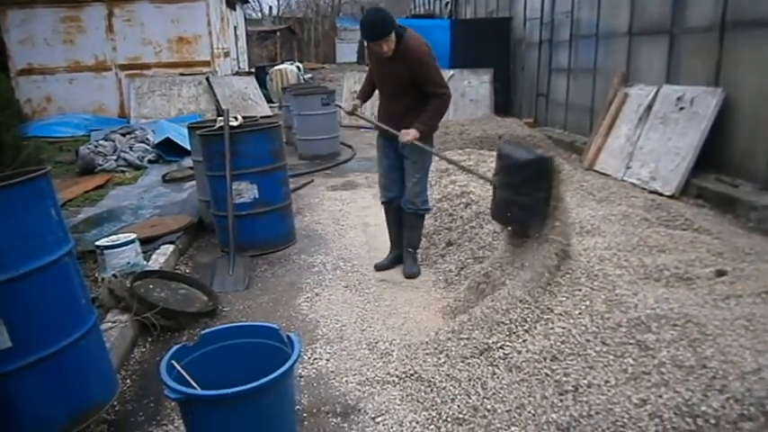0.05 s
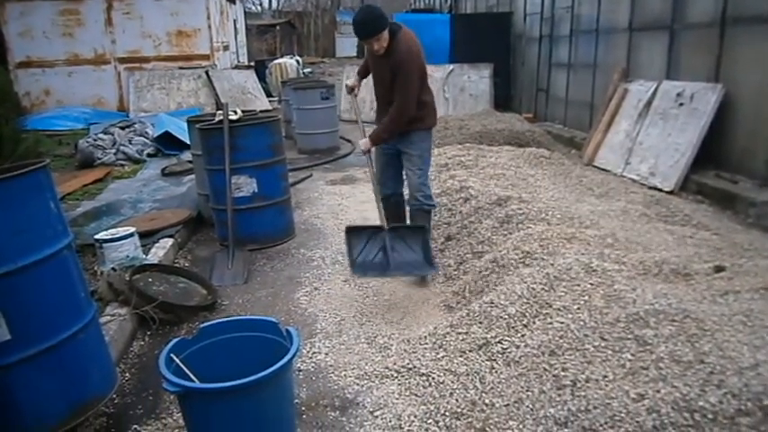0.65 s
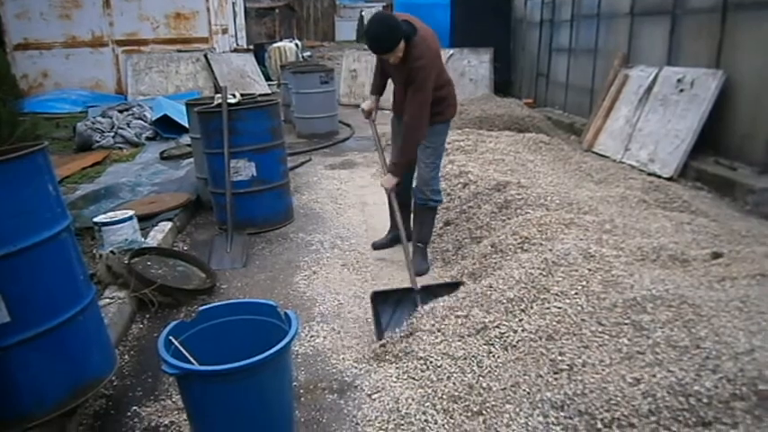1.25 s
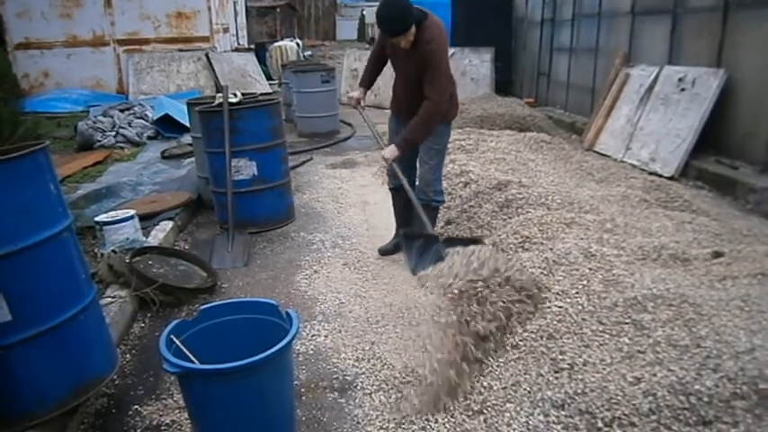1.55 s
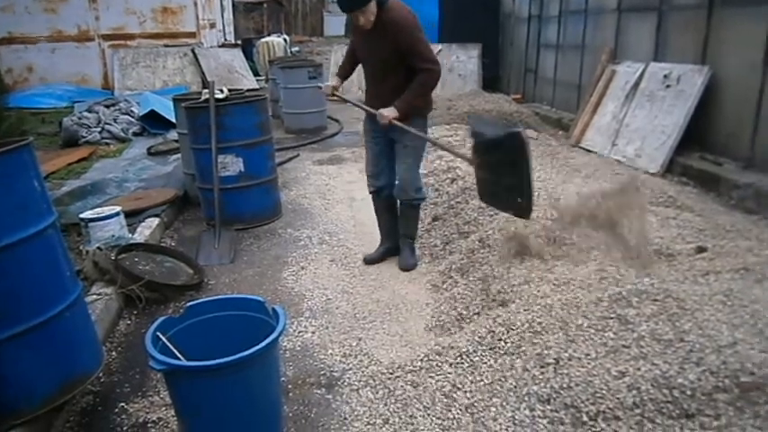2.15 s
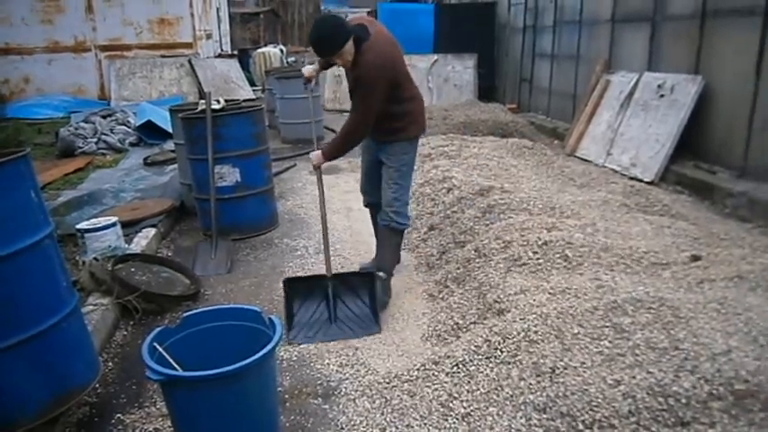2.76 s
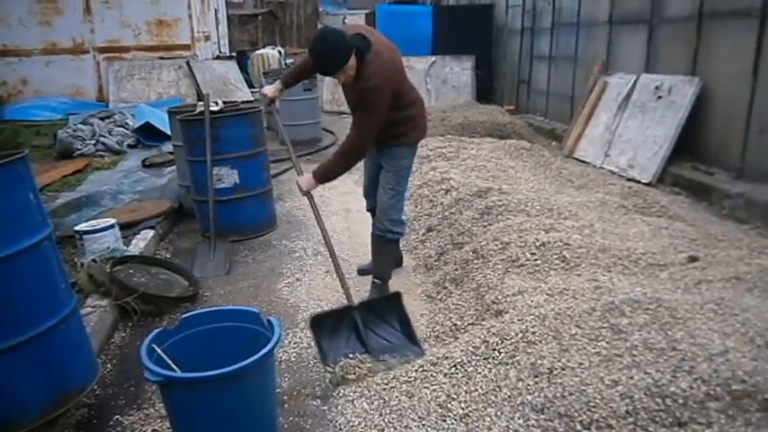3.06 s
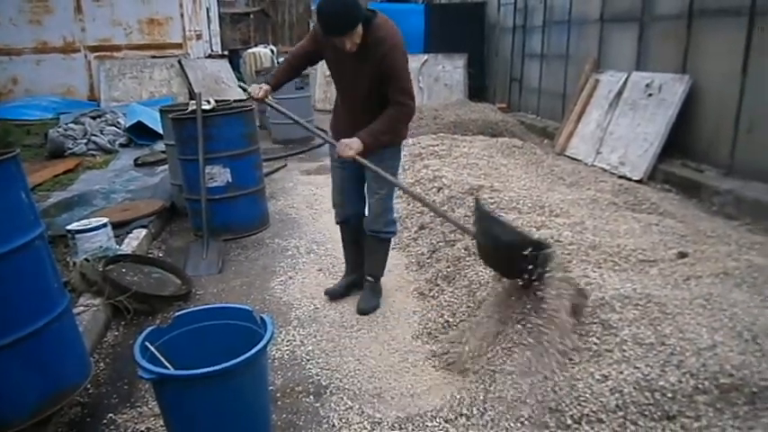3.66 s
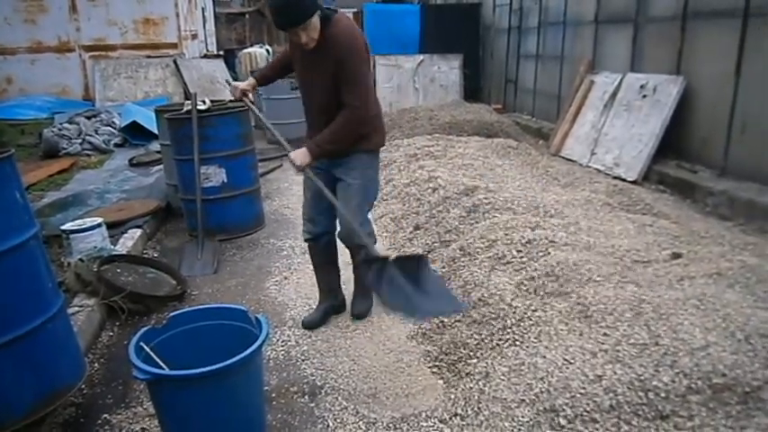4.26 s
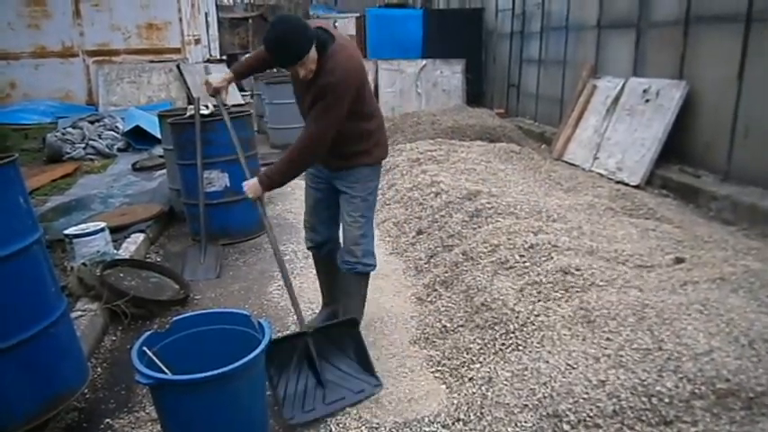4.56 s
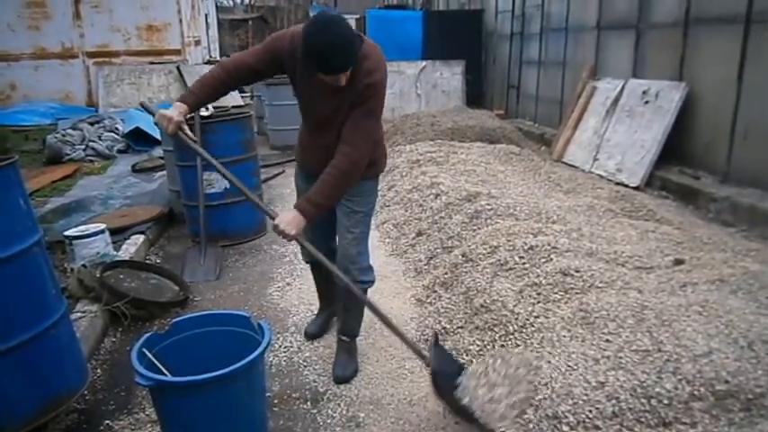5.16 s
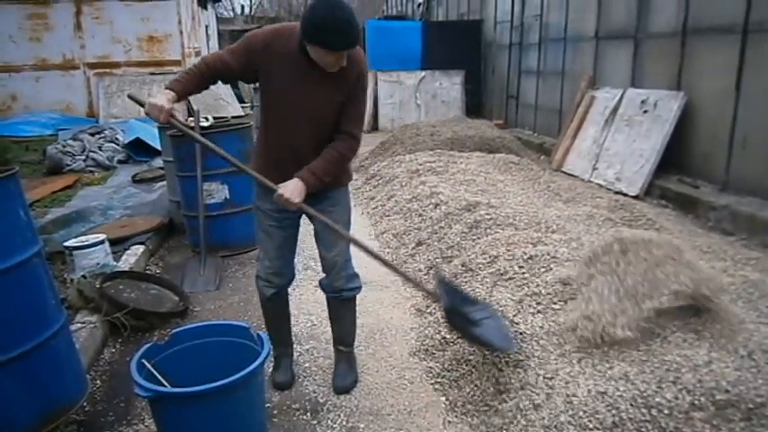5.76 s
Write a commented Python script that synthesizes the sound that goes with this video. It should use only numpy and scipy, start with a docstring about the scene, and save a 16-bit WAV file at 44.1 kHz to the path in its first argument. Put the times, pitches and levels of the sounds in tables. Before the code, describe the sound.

Outdoors between walls, a plastic shovel digs into a heap of dry chips three times. Each stroke knocks on the concrete, skids and rasps through grit with a hollow rattle of the blade, then gives way to a soft shower of chips landing. A faint wash of far traffic runs underneath, and the microphone sounds cheap, with a slight fizz in the treble.

```python
"""Light chips patter in a walled yard. At 0.8 s a wide plastic shovel clacks down on gritty concrete.
At 0.9, 2.9 and 4.7 s it is pushed into a heap of dry chips: the edge skids, then sticks and slips,
shaking the blade and crushing grit. After each push the tossed load patters softly on the heap.
Throughout: distant traffic, and a fizzy top from sample-and-hold at a telephone rate."""
import sys
import numpy as np
from scipy import signal
from scipy.fft import rfft, irfft, next_fast_len
from scipy.io import wavfile
from scipy.ndimage import map_coordinates

SR = 44100
rng = np.random.default_rng(int(sys.argv[2]) if len(sys.argv) > 2 else 0)


def unload_audio(sound):
    """Save the sound as a 16-bit wav file, at the path given as the first command line argument."""
    columns = np.transpose(np.atleast_2d(sound))
    # keep every value between -1 and 1, then stretch to whole-number steps
    steps = np.round(np.clip(columns, -1, 1) * 32767)
    wavfile.write(sys.argv[1], SR, steps.astype(np.int16))


N = 256220

# modes of plastic blade, stiff edge, whole pan: f/Hz, width/Hz, relative level/dB
BLADE_MODES = [(501, 37.4, 4.5), (660, 165, -4), (845, 95, 0.5), (1102, 49, 0), (1274, 245, -4.5),
               (1730, 220, -13.5)]
EDGE_MODES = [(2593, 130, 4.5), (3160, 240, -4), (3630, 190, 12)]
PAN_MODES = [(108, 21, -43), (163, 10.4, -2.5), (191, 12.5, -4), (267, 57, 3.5), (355, 230, -5.5)]
# spectra: f/Hz, relative level/dB
SCRAPE_SPECTRUM = [(40, -41), (150, -13.5), (300, -8.5), (450, -3), (600, 2), (1000, 0.5), (1400, 0.5),
                   (1800, -9), (2300, -14.5), (4000, -27.5)]
GRIT_SPECTRUM = [(300, -15), (1500, -20), (2000, -4), (2300, -13), (2700, 0), (3550, 5), (4000, -22),
                 (5000, -25.5)]

def pushes():
    """The edge chatters over concrete: slips shake blade and pan, burst grit and crack pebbles."""
    rasp_gain, grit_gain, rumble_gain = stroke_gains()
    chatter = unit(amp(1.3 * wobble(rate_hz=130)))
    slips = ticks(rate_hz=1200, spread_db=1) * chatter
    cracks = stick_slip(rate_hz=165, scatter=0.5, spread_db=4)
    crumbs = coloured(ticks(rate_hz=3500, spread_db=4.5) * chatter, SCRAPE_SPECTRUM)
    powder = coloured(ticks(rate_hz=5900, spread_db=2) * chatter, GRIT_SPECTRUM)
    rasp = sliding_contact(slips + amp(-9) * cracks, BLADE_MODES, wander_db=4, rate_hz=35) + crumbs
    pebbles = sliding_contact(cracks + amp(-10.5) * slips, EDGE_MODES, wander_db=4, rate_hz=70)
    crunch = pebbles + amp(-3) * coloured(cracks, GRIT_SPECTRUM) + amp(-2) * powder
    rumble = ringing(slips, PAN_MODES)
    return rasp_gain * unit(rasp) + grit_gain * unit(crunch) + rumble_gain * rumble


# effort, one curve per push: t/s, level/dB
PUSH_EFFORT = [
    [(0.946, -29), (0.96, -14), (1.042, -12.5), (1.136, -21), (1.16, -12.5), (1.234, -27), (1.252, -22.5),
     (1.262, -32)],
    [(2.868, -31), (2.904, -16.5), (3.022, -16.5), (3.04, -15), (3.1, -14.5), (3.116, -20), (3.126, -15.5),
     (3.206, -31), (3.215, -32)],
    [(4.728, -23.5), (4.744, -22), (4.784, -13), (4.808, -18), (4.826, -11), (4.94, -18.5), (4.952, -24.5),
     (5.048, -24), (5.055, -37)],
]
# pan pressing on the ground, per push: rumble level/dB at firm effort, pan empty
PAN_RUMBLE_DB = [-28, -25, -28.5]
# skids before the pushes: peak t/s, rasp level/dB, grit level/dB, rumble level/dB
SKIDS = [(0.862, -30, -43, -39), (0.887, -34.5, -35, -40), (2.833, -38, -36, -55), (2.852, -34, -38, -46),
         (2.883, -20.5, -47, -42), (4.646, -31, -37, -30.5), (4.667, -13.5, -30, -18)]

def stroke_gains(firm_db=-14.5, bite_db_per_s=1800, lift_db_per_s=454, fill_db_per_s=14):
    """Rasp, grit and rumble follow the effort of each push and the brief rise and fall of each skid."""
    t, gains = np.arange(N) / SR, np.zeros((3, N))
    for push, pan_db in zip(PUSH_EFFORT, PAN_RUMBLE_DB):
        at_s, level_db = np.transpose(push)
        early_s, lifted_s = np.maximum(at_s[0] - t, 0), np.maximum(t - at_s[-1], 0)
        filling_s = np.clip(t - at_s[0], 0, at_s[-1] - at_s[0])
        effort_db = np.interp(t, at_s, level_db) - firm_db
        effort_db -= bite_db_per_s * early_s + lift_db_per_s * lifted_s
        rasp_db = -16 + effort_db
        grit_db = -22.5 + 0.84 * effort_db
        rumble_db = pan_db + 0.92 * effort_db - fill_db_per_s * filling_s  # the load damps the pan
        gains += amp([rasp_db, grit_db, rumble_db])
        gains[0] += (lifted_s > 0) * amp(-42.5 - 66 * lifted_s)  # chips slide on in the lifted blade
    rise_db_per_s, fall_db_per_s = 900, 800
    for peak_s, *peaks_db in SKIDS:
        skid = amp(-np.maximum((peak_s - t) * rise_db_per_s, (t - peak_s) * fall_db_per_s))
        gains += np.outer(amp(peaks_db), skid)
    return gains


def stick_slip(rate_hz, scatter, spread_db):
    """The edge sticks and lets go: impulses of uneven spacing and size."""
    wait, size = rng.standard_normal((4000, 2)).T
    gaps = np.exp(scatter * wait - scatter ** 2 / 2)
    onsets = np.round(np.cumsum(gaps) * SR / rate_hz).astype(int)
    impulses = np.sign(rng.standard_normal(len(onsets))) * amp(spread_db * np.minimum(size, 2))
    return unit(np.bincount(onsets, impulses, N)[:N])


def sliding_contact(force, modes, wander_db, rate_hz):
    """Modes struck at a moving contact point, so each one's share comes and goes."""
    out = np.zeros(N)
    for k, (hz, width_hz, db) in enumerate(modes):
        share = amp(wander_db * np.clip(wobble(rate_hz), -2, 1))
        out += (-1) ** k * amp(db) * np.sqrt(width_hz) * ringing(force * share, [(hz, width_hz, 0)])
    return unit(out)


# edge lands or catches on a stone: t/s, clack level/dB, thud level/dB, snap level/dB, snap f/Hz
KNOCKS = [(0.843, -29.5, -35, -34.5, 3390), (1.034, -11.5, -33, -18, 3300), (1.086, -16, -40, -19.5, 3310),
          (1.25, -23.5, -29, -35, 3540), (2.746, -16.5, -24, -26, 3560), (2.905, -12.5, -38, -29, 3140),
          (2.93, -16, -24, -22, 3100), (3.041, -14.5, -19, -12, 3090), (3.077, -21, -28, -23, 3420),
          (3.135, -15, -43, -25, 3410), (4.558, -24.5, -23.5, -29, 3570), (4.663, -19.5, -36, -27.5, 3330),
          (4.747, -17, -23.5, -26.5, 3550), (4.845, -11, -17, -15, 3390), (4.871, -18, -24, -21.5, 3370),
          (4.938, -20, -28, -22, 3420), (4.968, -23.5, -36, -22.5, 2920)]

def knocks(contact_t60_s=0.022, ring_t60_s=0.022, settle_t60_s=0.19):
    """Brief crushing contacts: the blade clacks, the pan thuds, the edge rings, loose chips settle."""
    out, t = np.zeros(N + SR), np.arange(SR // 4) / SR
    thud = ringing(np.exp(-t / 0.0037), PAN_MODES)  # the blade's weight: one soft push
    attack = 1 - np.exp(-t / 0.00041)  # cushioned by grit
    for at_s, clack_db, thud_db, snap_db, snap_hz in KNOCKS:
        press, crumble, split = rng.standard_normal((3, len(t))) * attack * amp(-60 * t / contact_t60_s)
        clack = amp(-1) * ringing(press, BLADE_MODES) + coloured(crumble, SCRAPE_SPECTRUM)
        chips = ticks(rate_hz=560, spread_db=5.5)[:len(t)] * amp(-60 * t / settle_t60_s)
        settle = coloured(chips, CHIPS_SPECTRUM)
        ring = unit(attack * amp(-60 * t / ring_t60_s) * np.sin(2 * np.pi * snap_hz * t))
        ring_gain = amp(0.46 * (snap_db + 27))  # only a hard catch rings clearly
        snap = ring_gain * ring + coloured(split, GRIT_SPECTRUM)
        hit = amp(clack_db) * (unit_hit(clack) + amp(-16) * unit_hit(settle))
        hit += amp(thud_db) * unit_hit(thud) + amp(snap_db) * unit_hit(snap)
        out[round(at_s * SR):][:len(t)] += hit
    return out[:N]


# chip showers leaving the blade or landing: peak t/s, level/dB, half length/s
TOSSES = [(0.0, -47.5, 0.16), (0.35, -45.5, 0.18), (1.33, -46, 0.12), (1.7, -44, 0.2), (2.03, -41, 0.078),
          (2.21, -41.5, 0.075), (3.43, -46.5, 0.13), (3.75, -44.5, 0.2), (4.09, -46, 0.098),
          (4.28, -44, 0.022), (5.25, -47.5, 0.43), (5.78, -44.5, 0.15)]
# dry chips: f/Hz, relative level/dB
CHIPS_SPECTRUM = [(200, -22), (800, 0), (1500, -17), (2200, -3), (3300, 11.5), (4000, 10.5), (5000, -35)]

def tosses():
    """Thousands of light chips rain on the heap."""
    return swells(TOSSES) * coloured(ticks(rate_hz=2800, spread_db=-0.5), CHIPS_SPECTRUM)


# yard decay: f/Hz, t60/s
YARD_T60 = [(100, 0.074), (1000, 0.59), (4000, 0.49)]

def yard_echo(x, gap_s=0.012):
    """The walls answer after a short gap; the midrange lasts longest."""
    hz, t, noise = signal.stft(rng.standard_normal(SR // 2), SR, nperseg=256)
    decay = amp(-60 * t / log_interp(YARD_T60, hz)[:, None])
    tail = signal.istft(noise * decay, SR, nperseg=256)[1]
    delayed = np.pad(x, (round(gap_s * SR), 0))
    return signal.fftconvolve(delayed, tail / np.linalg.norm(tail))[:N]


# far traffic: t/s, level/dB
TRAFFIC_LEVEL = [(0, -38), (1.8, -38), (2.6, -35), (3.3, -37.5), (4.3, -38.5), (5.81, -37)]
# its spectrum: f/Hz, relative level/dB
TRAFFIC_SPECTRUM = [(20, -14), (45, -11), (70, -3), (110, -5), (200, -1), (400, -4), (600, -0.5),
                    (900, -1.5), (1230, 1), (1600, -4.5), (2100, -10), (3000, -13), (4000, -17.5),
                    (5000, -21.5)]

def traffic(fade_s=0.012):
    """Traffic beyond the walls: a broad, slightly wavering wash."""
    t = np.arange(N) / SR
    at_s, level_db = np.transpose(TRAFFIC_LEVEL)
    fade = np.clip(1 + np.minimum(t - at_s[0], at_s[-1] - t) / fade_s, 0, 1)
    gain = fade * amp(np.interp(t, at_s, level_db) + 0.65 * wobble(rate_hz=5.69))
    return gain * coloured(rng.standard_normal(N), TRAFFIC_SPECTRUM)


# drone swells: peak t/s, level/dB, half length/s
DRONE_SWELLS = [(3.68, -51, 0.15), (4.46, -56, 0.08)]

def drone(hz=61.4, width_hz=6, floor_db=-60):
    """A low, uneven drone far off: narrowband noise that swells twice."""
    return (amp(floor_db) + swells(DRONE_SWELLS)) * ringing(rng.standard_normal(N), [(hz, width_hz, 0)])


def amp(db):
    """Decibels to gain."""
    return 10 ** (np.asarray(db) / 20)


def unit(x):
    """x at rms 1."""
    return x / np.sqrt(np.mean(x ** 2) + 1e-20)


def unit_hit(x):
    """x with the energy of 10 ms at rms 1."""
    return x / np.sqrt(np.sum(x ** 2) / (SR / 100))


def log_interp(points, hz):
    """Interpolate (f/Hz, value) points on a log frequency axis."""
    knots_hz, values = np.transpose(points)
    return np.interp(np.log(hz + 1), np.log(knots_hz + 1), values)


def wobble(rate_hz):
    """Smooth random curve with knots at rate_hz."""
    return map_coordinates(rng.standard_normal(4096), [np.arange(N) * rate_hz / SR], mode="wrap")


def swells(rows):
    """Gain of Gaussian swells, summed in power."""
    t = np.arange(N) / SR
    return np.sqrt(sum(amp(db) ** 2 * np.exp(-((t - at_s) / half_s) ** 2) for at_s, db, half_s in rows))


def ticks(rate_hz, spread_db):
    """Impulses of random time, sign and size, at rms 1."""
    chance, size, sign = rng.random(N), rng.standard_normal(N), rng.choice([-1, 1], N)
    return unit((chance < rate_hz / SR) * sign * amp(spread_db * np.minimum(size, 2)))


def filtered(x, response):
    """x through a complex frequency response."""
    size = 2 * next_fast_len(len(x) // 2 + 8192)
    return irfft(rfft(x, size) * response(np.fft.rfftfreq(size, 1 / SR)), size)[:len(x)]


def coloured(x, spectrum):
    """x through a minimum-phase filter of that spectrum, at rms 1."""
    def response(hz):
        cepstrum = irfft(np.log(amp(log_interp(spectrum, hz))))
        return np.exp(rfft(2 * cepstrum[:len(hz) - 1], len(cepstrum)) - cepstrum[0])
    return unit(filtered(x, response))


def ringing(x, modes):
    """x through parallel resonances of alternating sign, at rms 1."""
    def response(hz):
        return sum((-1) ** k * amp(db) * 1j * hz * width_hz / (mode_hz**2 - hz**2 + 1j * hz * width_hz)
                   for k, (mode_hz, width_hz, db) in enumerate(modes))
    return unit(filtered(x, response))


def scene():
    """Shovel, yard echo, tossed chips and far background, in mono."""
    shovel = pushes() + knocks()
    return (shovel + amp(-14.5) * yard_echo(shovel) + tosses() + traffic() + drone())[None]


def record(dry, sample_hz=8000, top_hz=15750, dc_offset=-0.0124):
    """A slow converter with a small offset holds each sample, mirroring the sound into the treble."""
    length_s = N // SR + 1
    samples = signal.resample(np.pad(dry[0], (0, length_s * SR - N)), length_s * sample_hz)
    held = np.repeat(np.clip(samples, -1, 1), 12)
    staircase = signal.resample(held, length_s * SR)[:N]
    return filtered(staircase, lambda hz: hz < top_hz)[None] + dc_offset


dry = scene()
out = record(dry)
unload_audio(out)
```